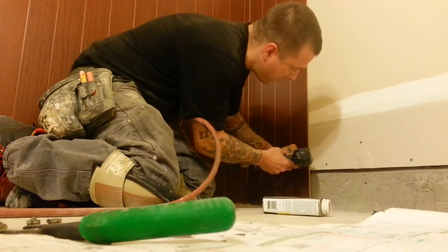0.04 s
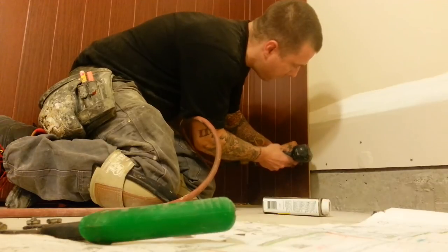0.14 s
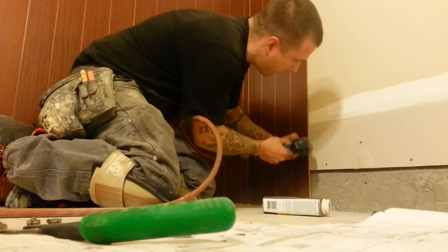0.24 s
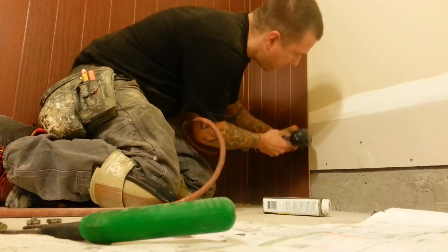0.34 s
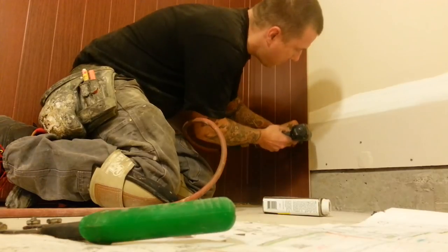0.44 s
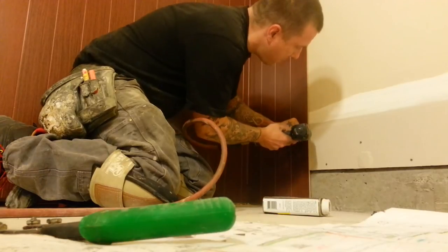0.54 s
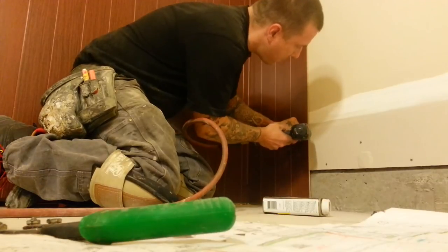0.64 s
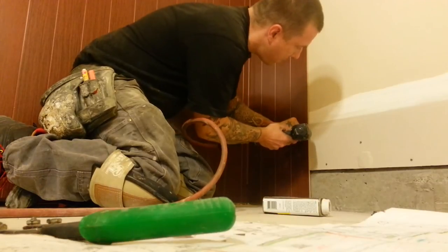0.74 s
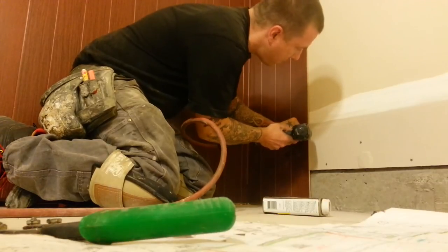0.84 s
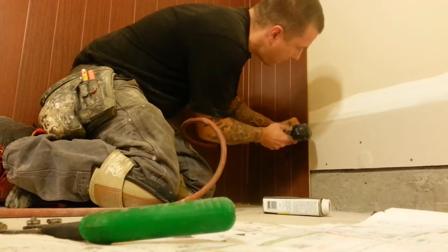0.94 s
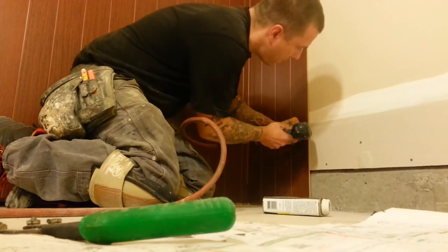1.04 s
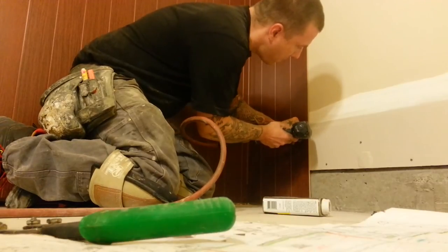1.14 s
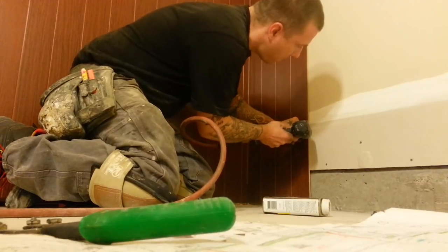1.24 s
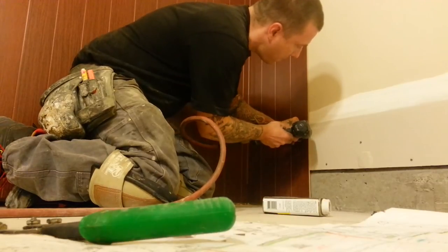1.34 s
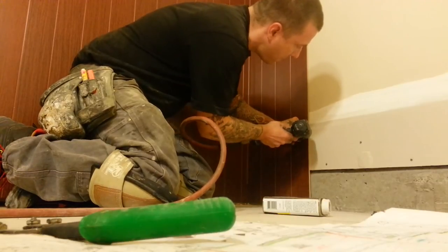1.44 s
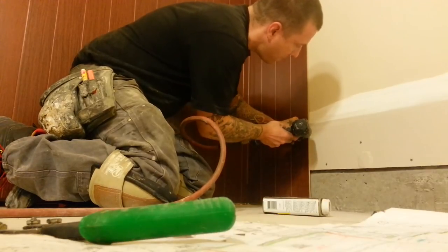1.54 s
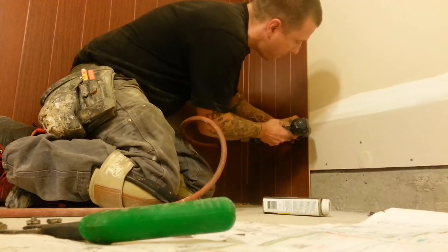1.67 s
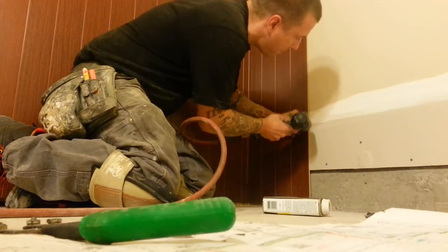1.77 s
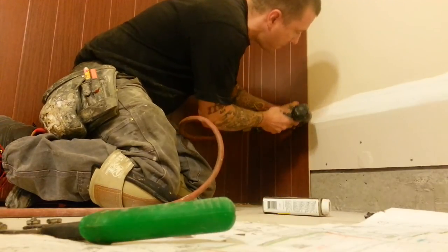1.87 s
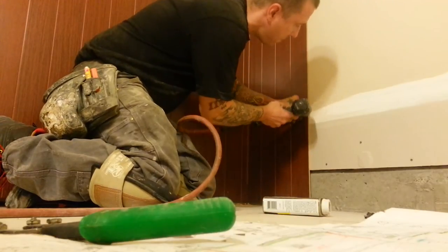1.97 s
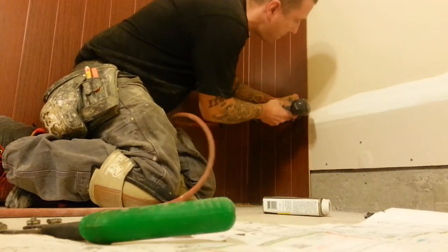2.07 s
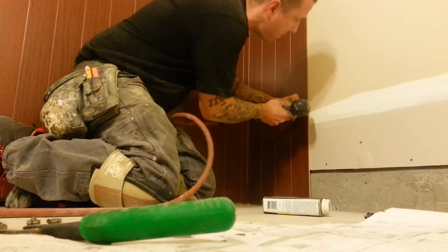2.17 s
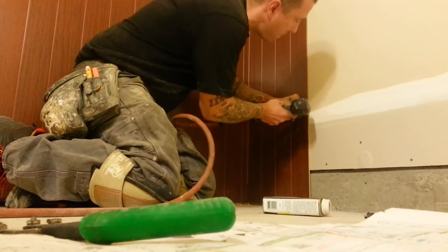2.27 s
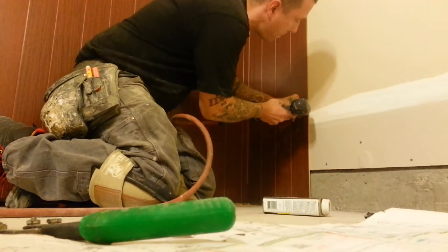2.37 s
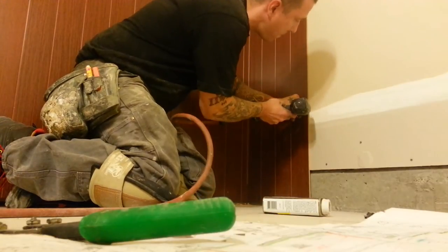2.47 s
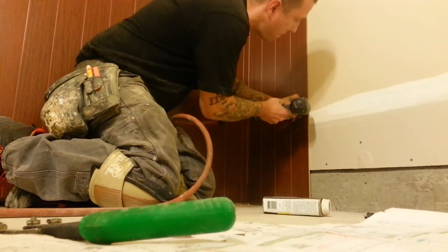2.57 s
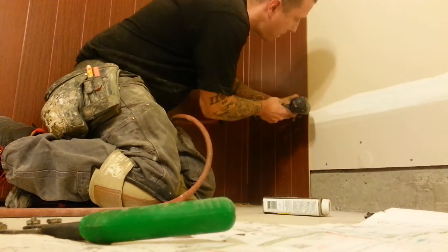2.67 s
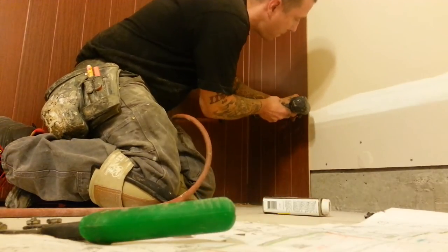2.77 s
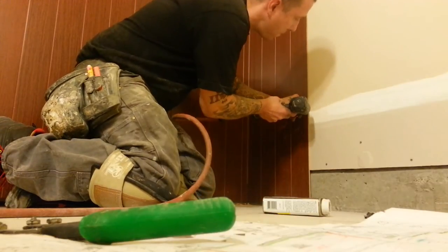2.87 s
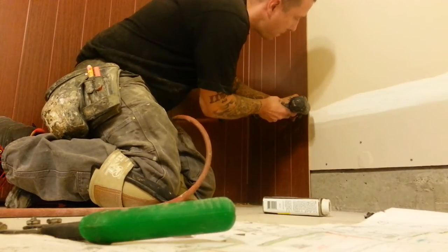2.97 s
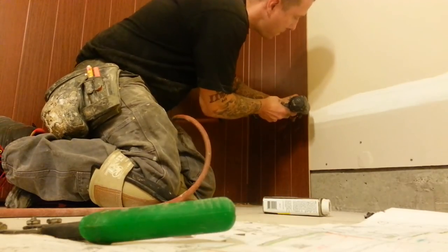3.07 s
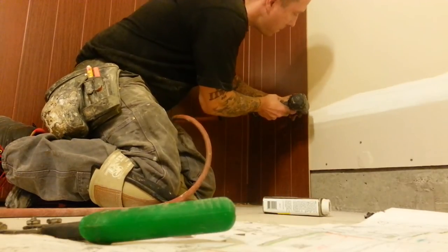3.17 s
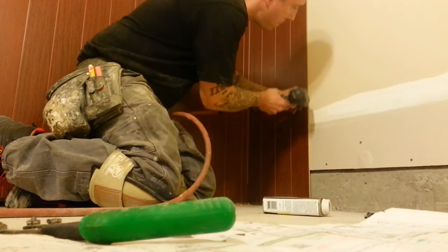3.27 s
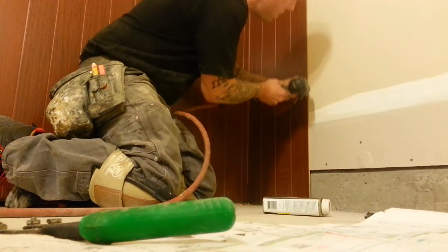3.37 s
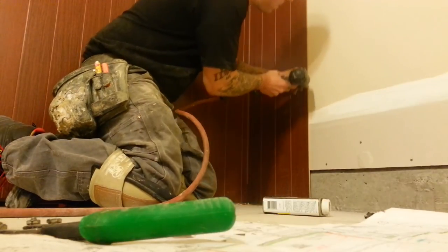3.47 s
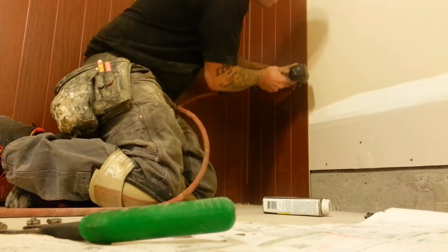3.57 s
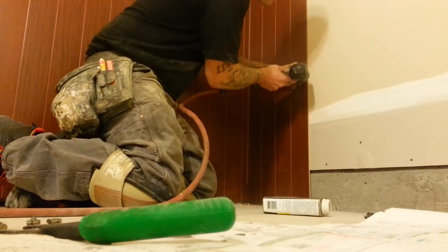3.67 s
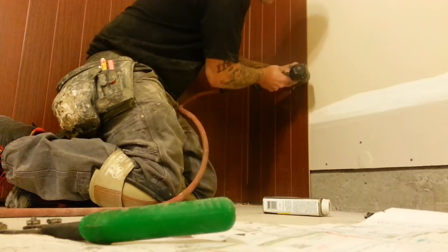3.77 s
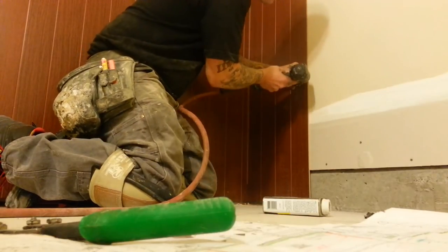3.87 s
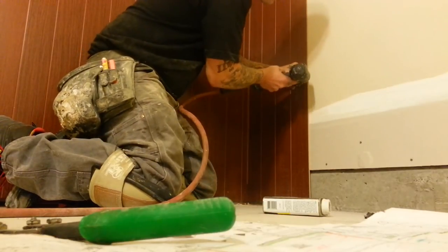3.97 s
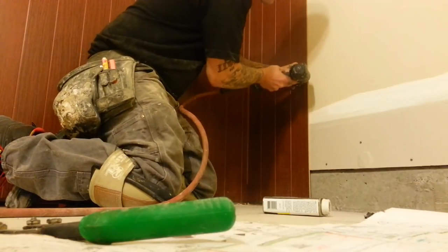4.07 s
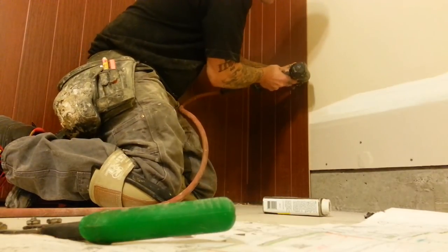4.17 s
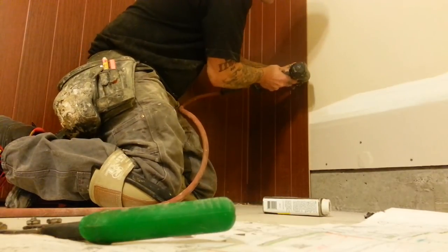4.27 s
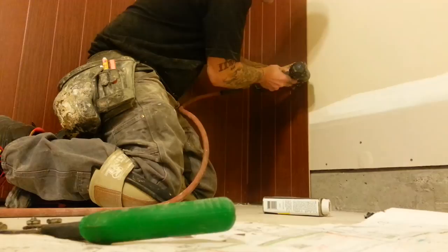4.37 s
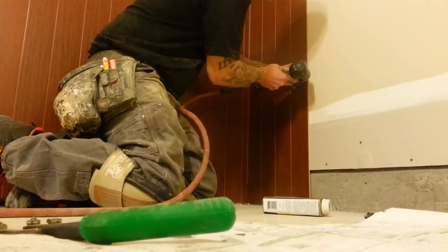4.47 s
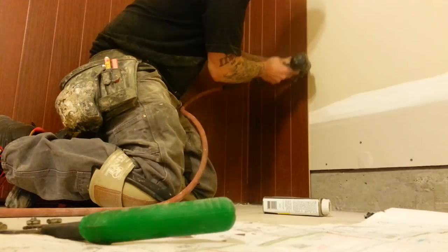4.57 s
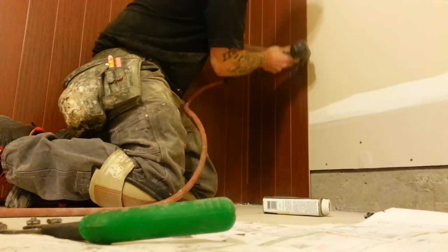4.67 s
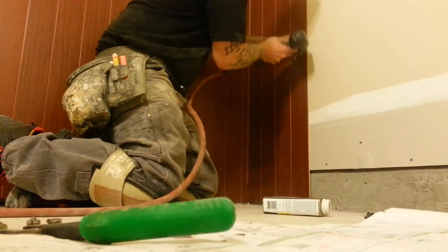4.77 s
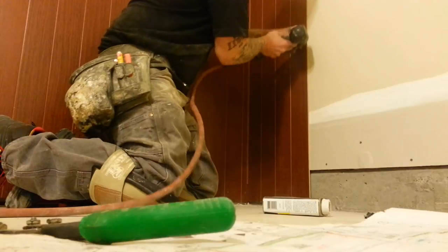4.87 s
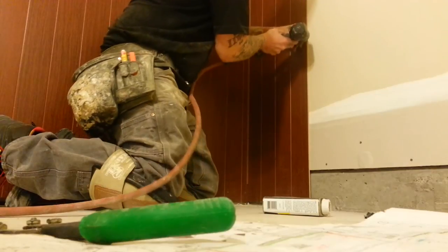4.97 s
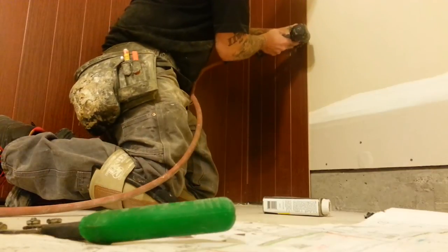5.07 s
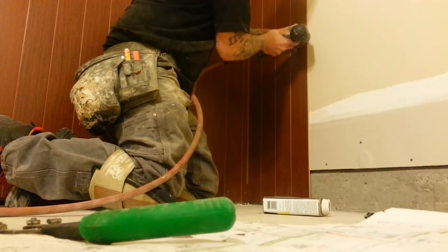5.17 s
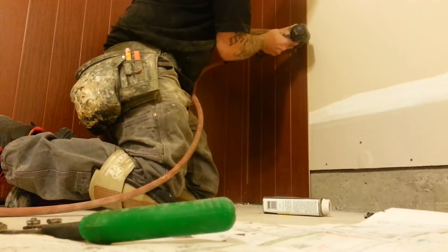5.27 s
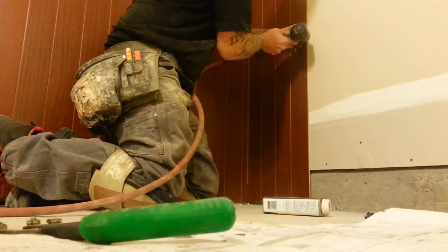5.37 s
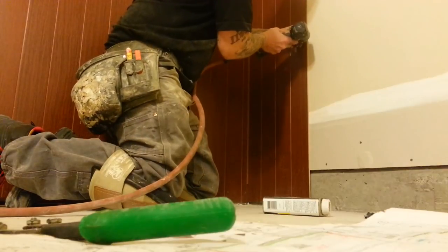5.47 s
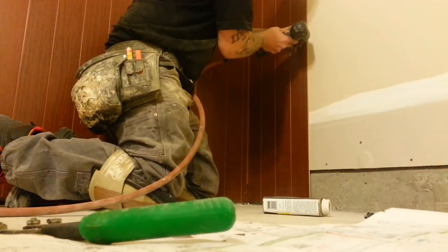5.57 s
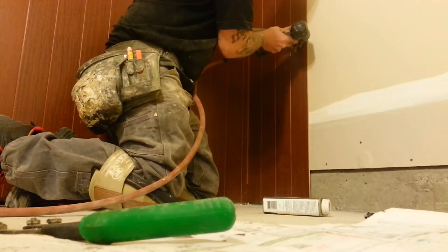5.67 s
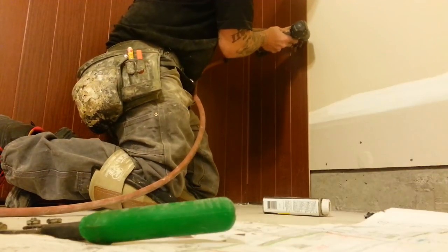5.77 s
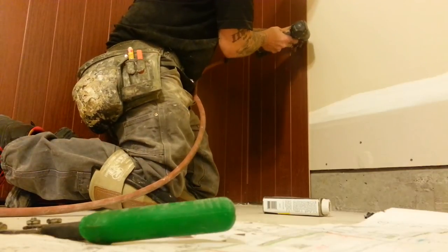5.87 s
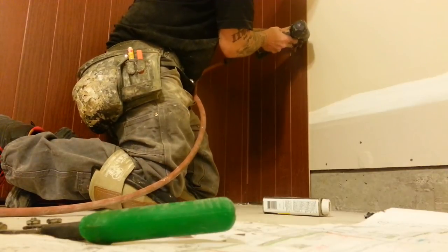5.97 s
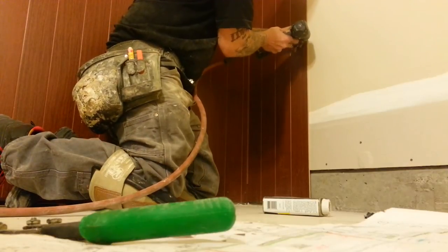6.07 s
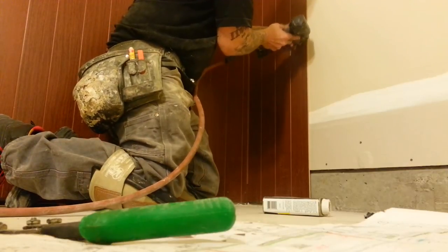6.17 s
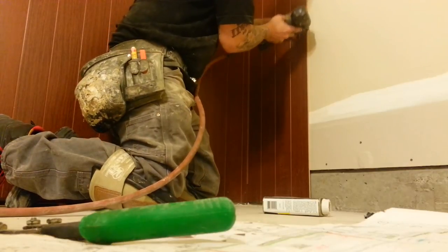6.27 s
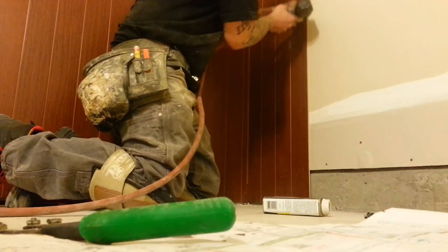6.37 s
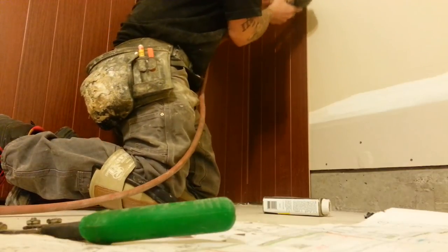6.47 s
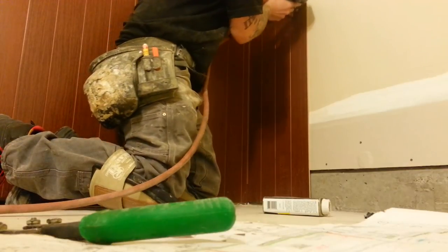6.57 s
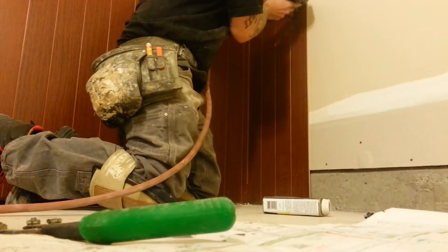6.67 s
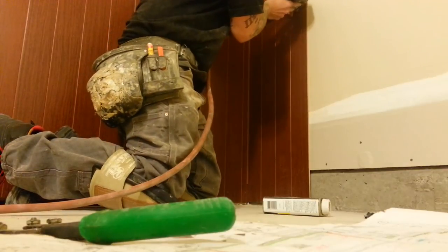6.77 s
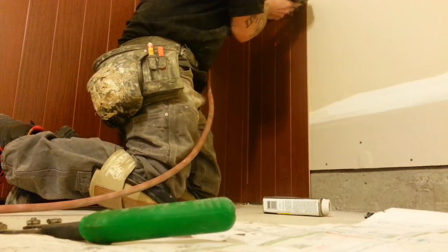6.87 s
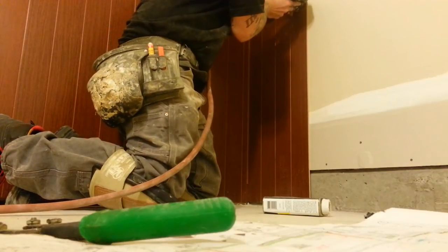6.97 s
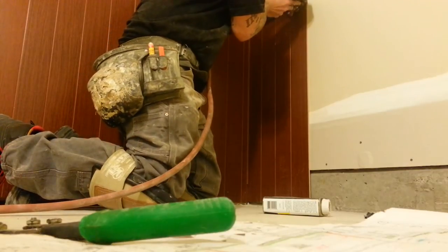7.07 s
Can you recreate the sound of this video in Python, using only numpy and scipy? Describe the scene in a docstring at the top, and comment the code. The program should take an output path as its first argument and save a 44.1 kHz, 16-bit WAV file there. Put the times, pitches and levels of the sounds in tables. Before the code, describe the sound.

Air-driven pins punch into hollow panelling: short hiss, hard metallic crack with wall boom, then a bright puff of exhaust and a soft piston knock. Four full shots follow an opening tail, all in a hard, reverberant room. Between them are muffled bumps, tiny ticks, a thin whistling leak, low rumble and faint hum. The recorder squashes and slightly overloads the bangs, with treble leaning right.

```python
"""A pneumatic brad nailer pins wood panelling to a wall in a large, bare shop room.
The first blow lands just before the start; its ring and echo open the scene, and four more blows follow.
Each of those starts with trigger-valve hiss, then the driver slams: noise bursts over ringing nose and wall modes.
After every blow the air blasts out as shaped noise and the piston thuds back. Between shots come dull bumps,
light clicks and a thin leak, over rumble and hum. The recorder's gain control and overload squash the bangs."""
import sys
import numpy as np
from scipy import signal
from scipy.fft import rfft, irfft, next_fast_len
from scipy.io import wavfile
from scipy.ndimage import uniform_filter1d

SR = 44100
rng = np.random.default_rng(int(sys.argv[2]) if len(sys.argv) > 2 else 0)


def output_pcm(signal):
    """Save a mono or channel-first signal as 16-bit PCM at the path in sys.argv[1].

    Samples are clipped to [-1, 1] before scaling.
    """
    pcm = np.clip(np.atleast_2d(signal).T, -1, 1) * 32767
    wavfile.write(sys.argv[1], SR, np.round(pcm).astype(np.int16))


N = 314433
LEAD = SR // 10  # samples of run-in, cut off at the end, that hold the first blow
TIME = np.arange(-LEAD, N) / SR  # s

# Levels in the tables are relative: mix gains, echo and the recorder still follow.
# driver blows: (time [s], trigger squeezed this long before [s], level [dB], decay [s],
# direct share [dB], hollow wall level [dB])
BLOWS = [(-.05, .04, 3, 0.026, -7.5, -4.5), (1.5418, 0.047, 7, 0.027, 3, -16.5),
         (3.0625, 0.075, 6.5, 0.022, 2.5, -13), (4.4205, 0.093, 3.5, 0.012, -8.5, -6),
         (6.0638, 0.037, 4.5, 0.013, -11.5, -1.5)]
# trigger let go, air exhausted: (time [s], first spit level [dB], port whistle level [dB])
EXHAUSTS = [(0.129, 7.5, -6.5), (1.661, -13, -30.5), (3.206, -12.5, -13.5), (4.583, -22.5, -12),
            (6.233, 6.5, -10.5)]
# ringing modes of the panelled wall: (frequency [Hz], level [dB], t60 [s])
PANEL_MODES = [(63.4, -1, .48), (83.6, 4.5, 0.32), (108, -3, 0.38), (142, -7, 0.25), (172, -6, 0.83),
               (197.2, -7.5, 0.33), (251, -11, 0.21)]
# colour of a dull knock: (frequency [Hz], level per Hz [dB])
THUD_COLOUR = [(25, -32), (70, -5), (150, -3), (210, -0.5), (300, -8.5), (600, -14.5), (1500, -25),
               (4000, -36), (12000, -56.5)]


def from_db(db):
    """Decibels to amplitude gain."""
    return 10 ** (np.asarray(db) / 20)


def at_hz(points, size):
    """A table over log frequency, read at the bins of a transform of this size."""
    hz, value = np.transpose(points)
    bins = np.fft.rfftfreq(size, 1 / SR)
    return np.interp(np.log(bins + 1), np.log(hz), value)


def colour(white, spectrum):
    """Two white noises become coloured stereo at rms 1, alike on both sides in the bass."""
    # stereo image: (frequency [Hz], left-right correlation [-1 to 1])
    likeness = [(100, 0.88), (290, .88), (630, .6), (1300, 0), (3000, 0)]
    size = white.shape[-1]
    mid, side = rfft(white)
    alike = np.clip(at_hz(likeness, size), -1, 1)
    gain = from_db(at_hz(spectrum, size))
    pair = np.sqrt(1 + alike) * mid + np.sqrt(1 - alike) * side * [[1], [-1]]
    return irfft(pair * gain, size) / np.sqrt(2 * np.mean(gain ** 2))


def air_noise(spectrum, size):
    """Steady stereo noise of a given colour, as turbulent air makes."""
    white = rng.standard_normal((2, next_fast_len(size)))
    return colour(white, spectrum)[:, :size]


def bursts(spectrum, rows, size=15000):
    """Puffs of noise (time s, dB, rise s, hold s, decay s) that swell, hold and die away."""
    out = np.zeros((2, len(TIME) + size))
    age = np.arange(size) / SR
    for s, db, rise, hold, decay in rows:
        swell = np.minimum(age / rise, 1) ** 2
        # hold counts from the start of the rise
        fade = np.exp(-np.maximum(age - hold, 0) / decay)
        start = LEAD + round(s * SR)
        out[:, start:start + size] += from_db(db) * swell * fade * air_noise(spectrum, size)
    return out[:, :len(TIME)]


def ring(modes, hits, swell, size=30000):
    """Hits (time s, dB) set every mode of a body ringing; a soft push takes longer (s) to swell."""
    out = np.zeros(len(TIME) + size)
    age = np.arange(size) / SR
    tone = 0
    for hz, db, t60 in modes:
        decay = np.exp(-np.log(1000) * age / t60)
        tone = tone + from_db(db) * np.sin(2 * np.pi * hz * age) * decay
    for s, db in hits:
        start = LEAD + round(s * SR)
        out[start:start + size] += from_db(db) * tone * np.minimum(age / swell, 1)
    return out[:len(TIME)]


# Each tool source returns (heard directly, sent to the room).
def driver(nose_db=4, nose_room_db=-7, panel_db=-25, crack_db=-1, crack_delay_s=.0045, crack_direct_db=-4):
    """The driver rings the nose and the hollow wall, then cracks against its bumper a moment later."""
    # colours of the blow, the hollow wall and the crack: (frequency [Hz], level per Hz [dB])
    blow_colour = [(25, -42.5), (90, -7.5), (220, -4), (450, 0), (900, -5.5), (1500, 4), (2050, -6),
                   (2500, -2), (3600, -11), (5200, -7.5), (8000, -15.5), (11500, -20), (15000, -34.5)]
    hollow_colour = [(100, -30.5), (270, -4.5), (370, 2), (500, -5), (680, -3), (1200, -21), (5000, -46.5)]
    crack_colour = [(500, -17.5), (2800, 1.5), (7000, -13.5), (15000, -17.5)]
    # ringing modes of the gun's nose: (frequency [Hz], level [dB], t60 [s])
    nose_modes = [(1350, -3, 0.03), (1580, -0.5, 0.052), (1780, -4.5, 0.009)]
    direct, sent = 0, 0
    for s, _, db, decay, direct_db, hollow_db in BLOWS:
        blow = bursts(blow_colour, [(s, db, .002, .002, decay)])
        hollow = bursts(hollow_colour, [(s, hollow_db, .006, .006, .014)])
        wood = blow + hollow
        crack = bursts(crack_colour, [(s + crack_delay_s, db + crack_db, .0006, .001, .004)])
        nose = ring(nose_modes, [(s, db + nose_db)], swell=0.00033, size=4000)
        direct = direct + from_db(direct_db) * (wood + nose) + from_db(crack_direct_db) * crack
        sent = sent + wood + crack + from_db(nose_room_db) * nose
    # the harder the direct kick, the more the whole wall shakes
    kicks = [(s, db + kick_db + panel_db) for s, _, db, _, kick_db, _ in BLOWS]
    return direct + ring(PANEL_MODES, kicks, swell=0.0052), sent


def exhaust(blast_db=-1.5, direct_db=-8, spit_room_db=-16):
    """The same cylinder empties each time: a bright spit and a fading blast that makes the port whistle."""
    # colours of the blast, the spit and the whistling port: (frequency [Hz], level per Hz [dB])
    blast_colour = [(50, -24.5), (200, -11.5), (340, -6), (520, 1.5), (760, -4), (1020, 3), (1600, 2.5),
                    (2000, -2.5), (2500, 3.5), (3600, -2), (5300, 1), (8000, -5.5), (11000, -8.5),
                    (15000, -17)]
    spit_colour = [(200, -9), (1500, -1.5), (5000, -2), (9000, -9), (15000, -4)]
    port_colour = [(700, -33.5), (1000, -12), (1120, 0.5), (1200, -2.5), (1290, -5), (1420, -19),
                   (2000, -39.5), (5000, -60)]
    blast = bursts(blast_colour, [(s, blast_db, .008, .015, .06) for s, _, _ in EXHAUSTS])
    spit = bursts(spit_colour, [(s, db, .009, .027, .005) for s, db, _ in EXHAUSTS])
    whistle = bursts(port_colour, [(s, db, .012, .015, .05) for s, _, db in EXHAUSTS])
    direct = from_db(direct_db) * (blast + whistle) + spit
    return direct, blast + whistle + from_db(spit_room_db) * spit


def piston(delay_s=.033, return_db=-8, direct_db=-5, panel_db=-19):
    """After each exhaust the piston thuds back to the top and shakes the wall through the gun."""
    landings = [s + delay_s for s, _, _ in EXHAUSTS]
    thud = bursts(THUD_COLOUR, [(s, return_db, .002, .002, .022) for s in landings])
    shake = ring(PANEL_MODES, [(s, return_db + panel_db) for s in landings], swell=0.01)
    return from_db(direct_db) * thud + shake, thud


def valve(hiss_db=-17, shuts_early_s=.014, room_db=-10):
    """Air rushes through the trigger valve at one strength and starts to die just before the blow."""
    # colour of the valve's hiss: (frequency [Hz], level per Hz [dB])
    valve_colour = [(60, -15), (160, -7.5), (400, -19.5), (1000, -17.5), (2000, -8.5), (2550, 5),
                    (2950, -0.5), (3600, -2.5), (7000, -5.5), (10000, -9), (13500, -5.5), (16000, -15.5)]
    rows = []
    for s, squeeze, *_ in BLOWS:
        if s > 0:  # the first blow has no hiss
            rows.append((s - squeeze, hiss_db, .012, squeeze - shuts_early_s, .009))
    hiss = bursts(valve_colour, rows)
    return hiss, from_db(room_db) * hiss


def handling(panel_db=-1, direct_db=-5, room_db=-5, tick_room_db=1):
    """Soft bumps make the wall boom and scuff along it; the safety tip clicks."""
    # dull bumps against the panel: (time [s], level [dB], scuff relative to bump [dB])
    bump_hits = [(0.926, -40, -9.5), (2.156, -33.5, -17.5), (3.858, -34, -17.5), (5.188, -32, -12.5),
                 (5.571, -37.5, -18.5), (6.773, -28, -5)]
    # light clicks of the safety tip: (time [s], level [dB])
    tip_clicks = [(1.379, -44), (1.476, -53.5), (4.203, -57)]
    # colours of the scuff and the tip: (frequency [Hz], level per Hz [dB])
    scuff_colour = [(100, -4.5), (300, 1), (700, -6.5), (2500, -15.5), (6000, -36), (14000, -50.5)]
    tip_colour = [(200, -2.5), (700, -12), (2700, -2.5), (4200, -9), (5400, 3), (6800, -8), (14000, -19)]
    bump = bursts(THUD_COLOUR, [(s, db, .014, .02, .04) for s, db, _ in bump_hits])
    scuff = bursts(scuff_colour, [(s, db + scuff_db, .002, .02, .045) for s, db, scuff_db in bump_hits])
    tick = bursts(tip_colour, [(s, db, .002, .002, .01) for s, db in tip_clicks])
    boom = ring(PANEL_MODES, [(s, db + panel_db) for s, db, _ in bump_hits], swell=0.018)
    contact = bump + scuff
    direct = boom + from_db(direct_db) * contact + tick
    return direct, from_db(room_db) * contact + from_db(tick_room_db) * tick


def air_leak(level_db=-73.5, rise_s=.03, fade_s=.04, pitch_hz=1459, waver_hz=4, flutter_db=3):
    """Leaking air whistles thinly: a sine whose pitch and level wander at random."""
    # spells of leaking: (time [s], length before fading [s])
    leak_spells = [(1.252, 0.21), (2.559, .42)]
    knots = np.arange(TIME[0], TIME[-1], .04)
    waver, flutter = (np.interp(TIME, knots, row) for row in rng.standard_normal((2, len(knots))))
    phase = 2 * np.pi * np.cumsum(pitch_hz + waver_hz * waver) / SR
    whistle = from_db(level_db + flutter_db * flutter) * np.sin(phase)
    envelope = 0
    for s, length in leak_spells:
        age = TIME - s
        fade = np.exp(-np.clip((age - length) / fade_s, 0, 20))
        envelope = envelope + np.clip(age / rise_s, 0, 1) * fade
    return envelope * whistle


def steady_hum(lift_db=4):
    """Faint steady hum in the room, a sum of sines."""
    # hum partials: (frequency [Hz], level before the common lift [dB])
    hum_tones = [(118.4, -77.5), (199.2, -75.5), (290.7, -75), (457.6, -85.5)]
    return sum(from_db(db + lift_db) * np.sin(2 * np.pi * hz * TIME) for hz, db in hum_tones)


def rumble(floor_db=-60):
    """Low room rumble: steady noise weighted to the bass."""
    # colour of the rumble: (frequency [Hz], level per Hz [dB])
    rumble_colour = [(30, -22), (60, -6.5), (120, -5.5), (200, -2.5), (310, -6), (500, -12), (1000, -19),
                     (4000, -25), (14000, -29)]
    return from_db(floor_db) * air_noise(rumble_colour, len(TIME))


def room(x, build_up_s=0.014, size=49152):
    """Diffuse echo: noise bands die at their own rates, the top treble fastest; standing waves boom."""
    # decay of the room: (frequency [Hz], t60 [s])
    room_t60 = [(60, 0.66), (200, 0.77), (600, 0.8549), (1600, 0.91), (5000, 0.7323), (9000, 0.566),
                (15000, 0.2)]
    # standing waves: (frequency [Hz], width [Hz], boost [dB])
    standing_waves = [(213, 5.1, 5.5)]
    age = np.arange(size) / SR
    hz = np.fft.rfftfreq(size, 1 / SR)
    boost_db = sum(db / (1 + (2 * (hz - centre) / width) ** 2) for centre, width, db in standing_waves)
    flat = [(1, 0), (SR, 0)]
    white = from_db(boost_db) * rfft(air_noise(flat, size))
    t60 = at_hz(room_t60, size)
    band = np.round(6 * np.log2(hz + 300))  # about six bands an octave, wider in the bass
    echo = 0
    for k in np.unique(band):
        inside = band == k
        echo = echo + irfft(white * inside) * np.exp(-np.log(1000) * age / t60[inside].mean())
    echo = echo * np.minimum(age / build_up_s, 1) * np.sqrt(2 * np.log(1000) / SR)
    # one channel feeds the stereo echo
    return signal.fftconvolve(x[:1], echo, axes=1)[:, :len(TIME)]


def scene():
    """All sources and their echo; the bare wall on the right gives that side more treble."""
    # stereo balance: (frequency [Hz], left minus right [dB])
    balance = [(100, -0.5), (350, 1.8), (1300, 0.4), (2400, 0), (4500, -8.5), (8000, -8.5), (13000, -0.5)]
    sources = [driver(), exhaust(), piston(), valve(), handling()]
    direct, sent = map(sum, zip(*sources))
    size = next_fast_len(len(TIME) + LEAD)
    lean = from_db(at_hz(balance, size) * [[.5], [-.5]])
    sound = irfft(rfft(direct + room(sent), size) * lean, size)[:, :len(TIME)]
    background = rumble() + steady_hum() + air_leak()
    return (sound + background)[:, LEAD:]


def gain_control(x, limit_db, fall_per_s=430., recover_per_s=160.0, size=32):
    """Above the limit the gain slides down, and later back up, at no more than set rates in dB per second."""
    power = uniform_filter1d(np.mean(x ** 2, axis=0), size=256)[::size]
    excess = np.maximum(10 * np.log10(np.abs(power) + 1e-12) - limit_db, 0)
    cut = [excess[:10].mean()]  # dB, already turned down at the start
    step = size / SR
    for wanted in excess:
        lowest = cut[-1] - recover_per_s * step
        highest = cut[-1] + fall_per_s * step
        cut.append(min(max(wanted, lowest), highest))
    return x * from_db(-np.interp(np.arange(N) / size, np.arange(len(cut)), cut))


def suppress_quiet(x, knee_db=-40, slope=0.36, depth_db=7.0):
    """Noise suppressor: sound below the knee is turned down, so the last of each echo sinks faster."""
    power = uniform_filter1d(np.mean(x ** 2, axis=0), size=2048)
    under = knee_db - 10 * np.log10(np.abs(power) + 1e-12)
    return x * from_db(-np.clip(slope * under, 0, depth_db))


def record(dry):
    """Gain control, noise suppression, overload near full scale, and a steep top cut."""
    levelled = gain_control(dry, limit_db=-13.0)
    loud = np.clip(suppress_quiet(levelled), -.96, .96)
    cutoff_hz = 14800
    top_cut = signal.ellip(10, .1, 70, cutoff_hz, fs=SR, output="sos")
    return signal.sosfilt(top_cut, loud)


dry = scene()
out = record(dry)
output_pcm(out)
```